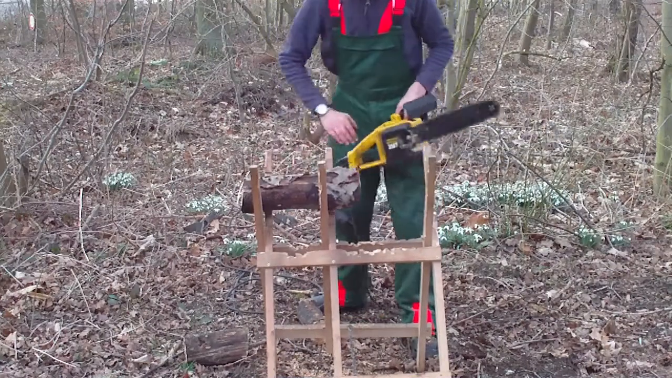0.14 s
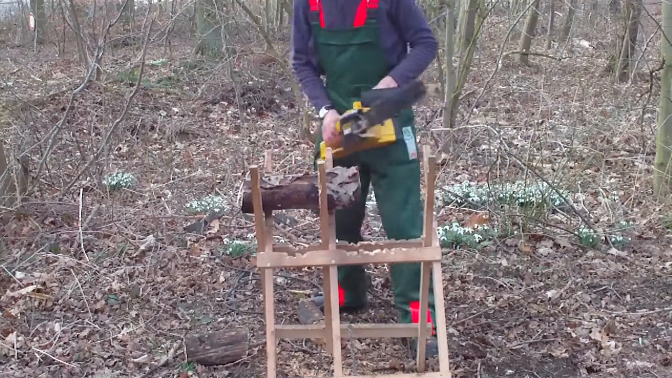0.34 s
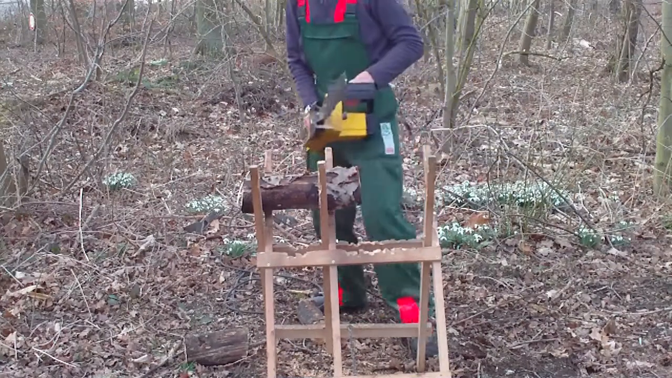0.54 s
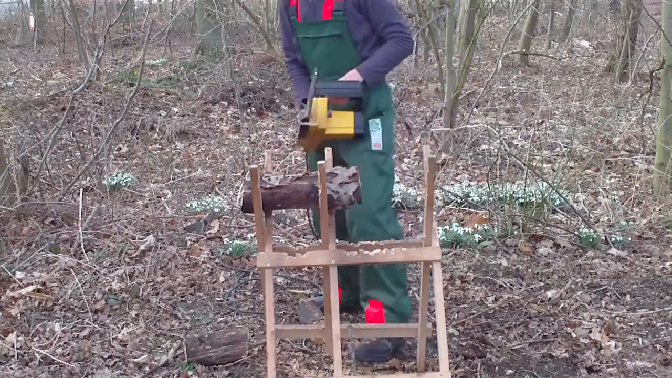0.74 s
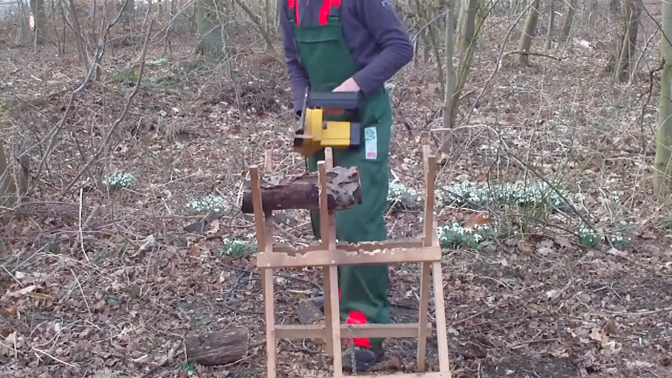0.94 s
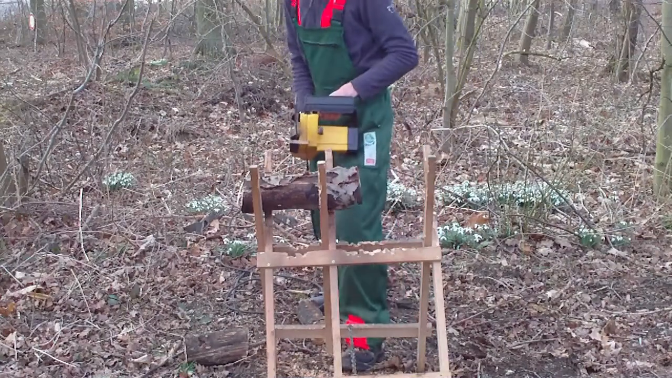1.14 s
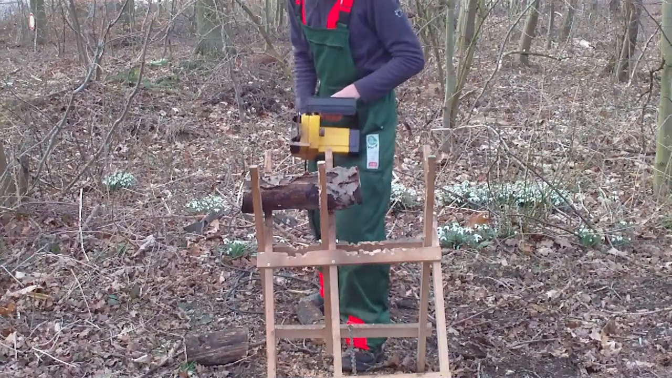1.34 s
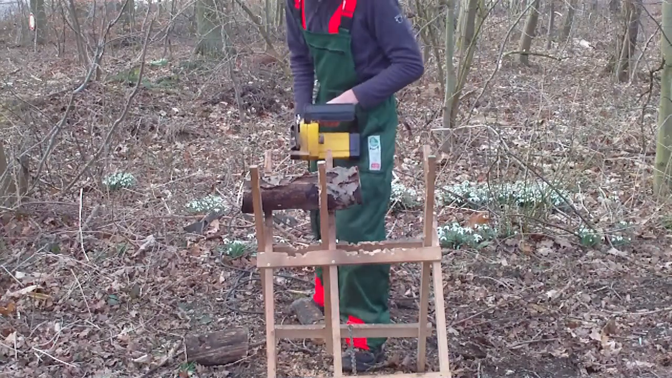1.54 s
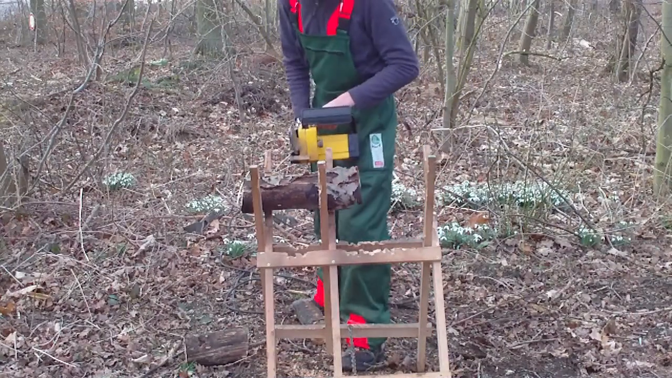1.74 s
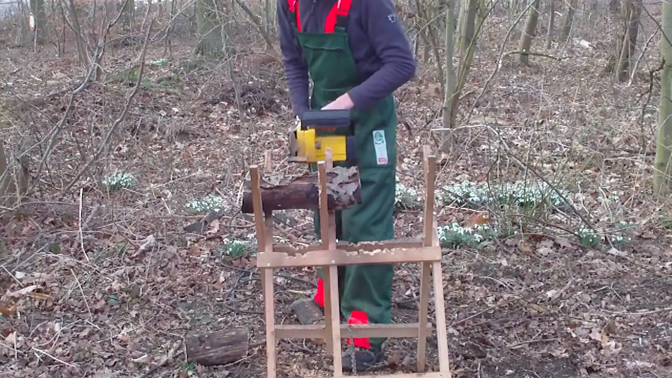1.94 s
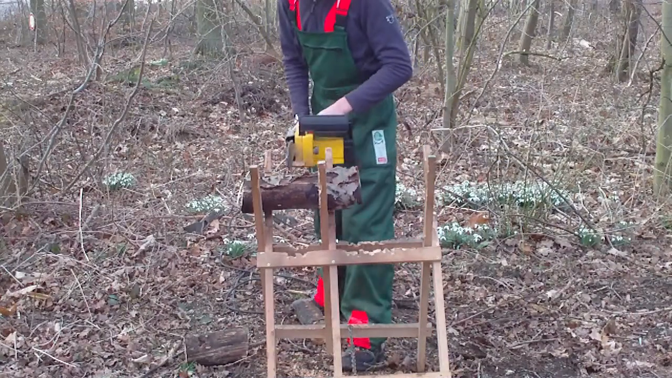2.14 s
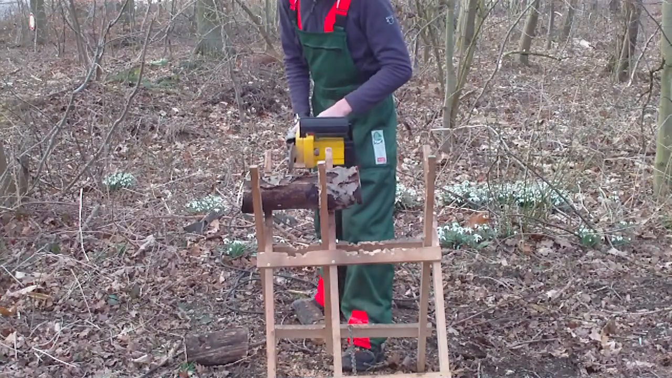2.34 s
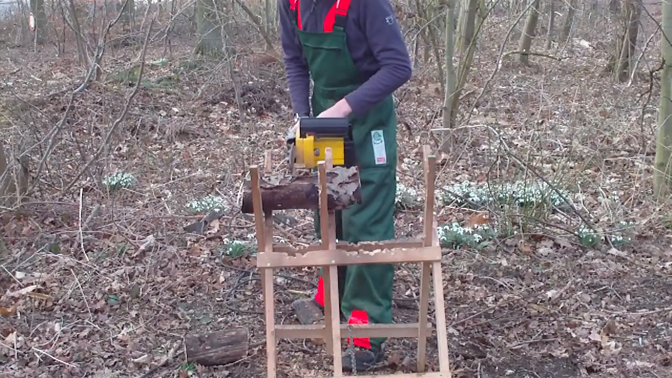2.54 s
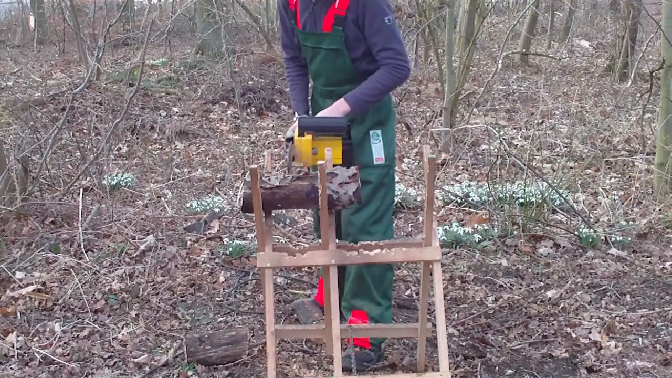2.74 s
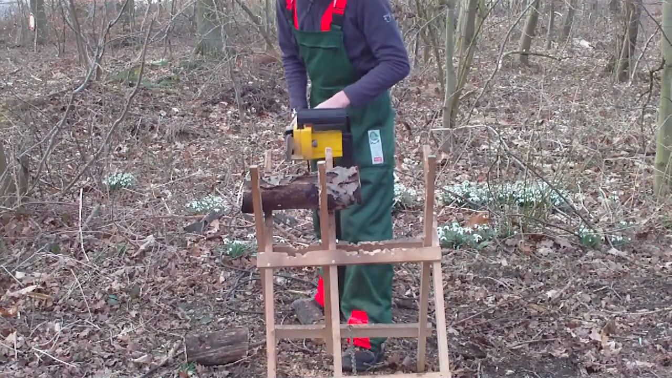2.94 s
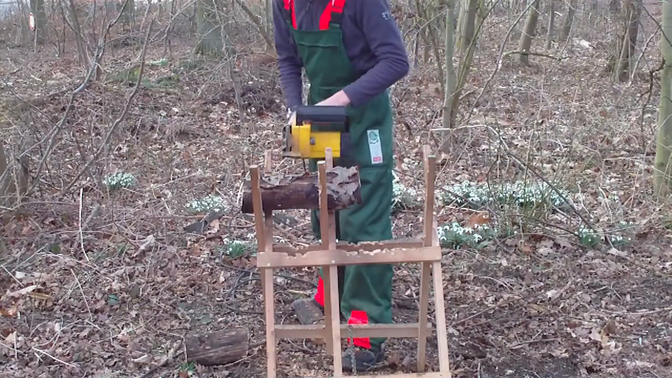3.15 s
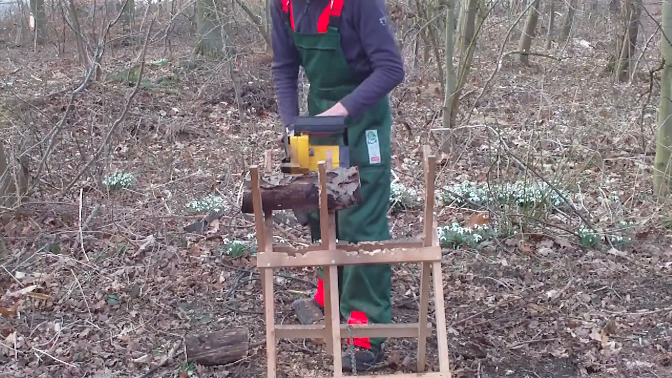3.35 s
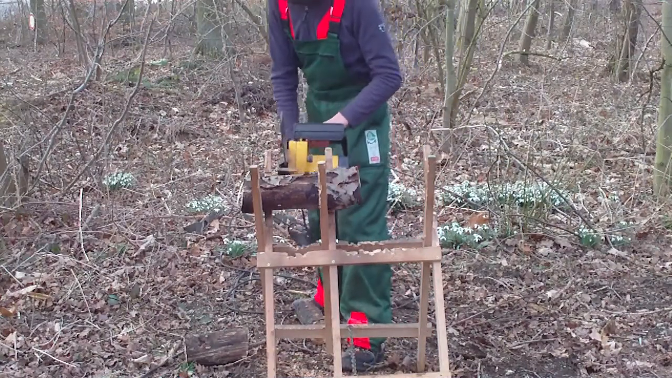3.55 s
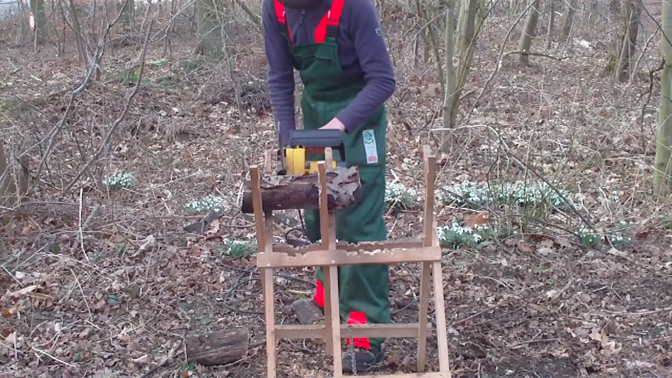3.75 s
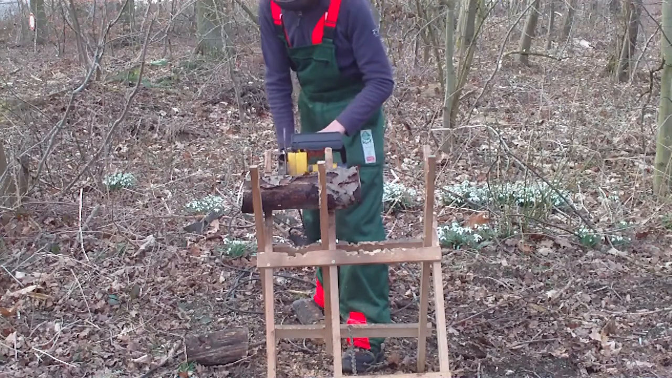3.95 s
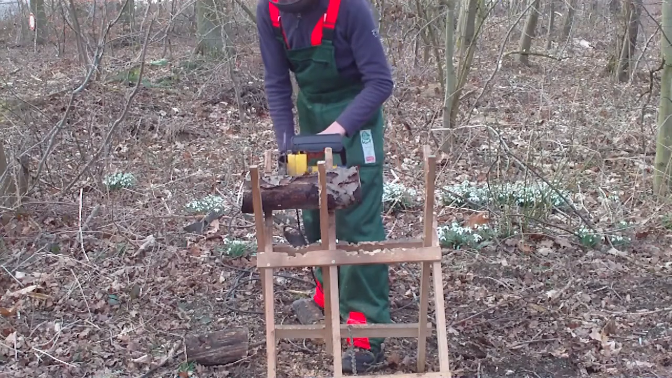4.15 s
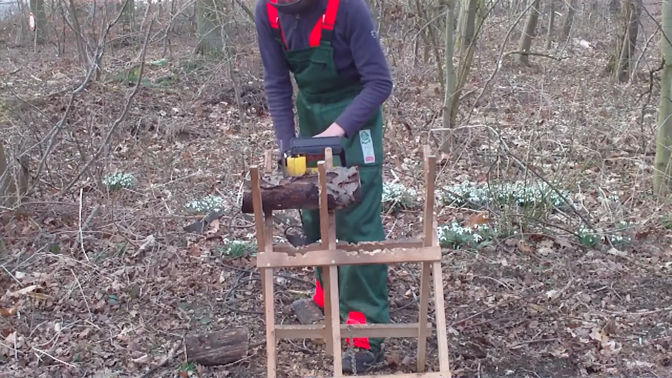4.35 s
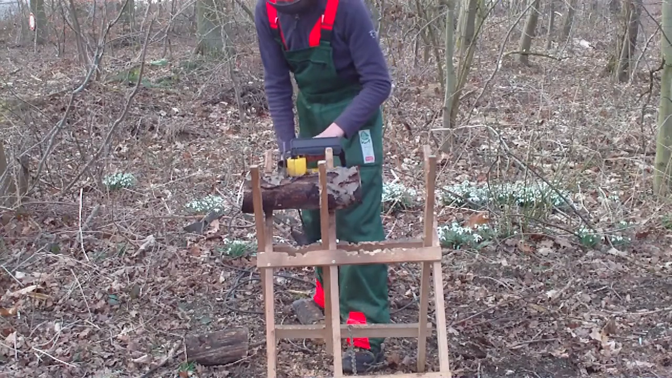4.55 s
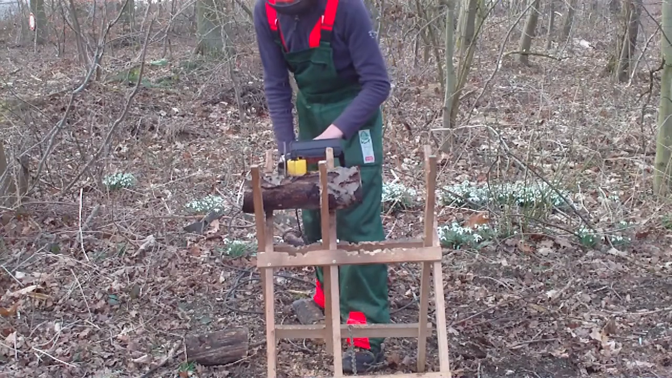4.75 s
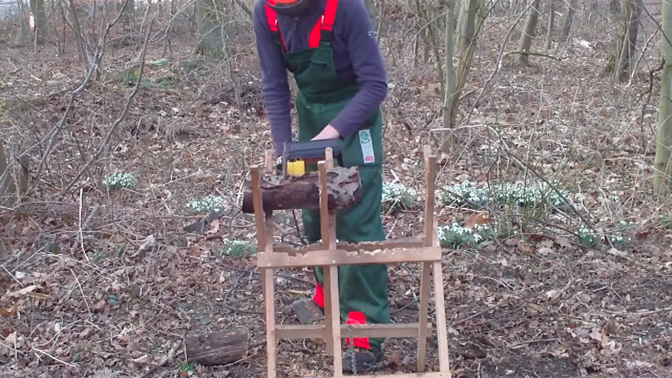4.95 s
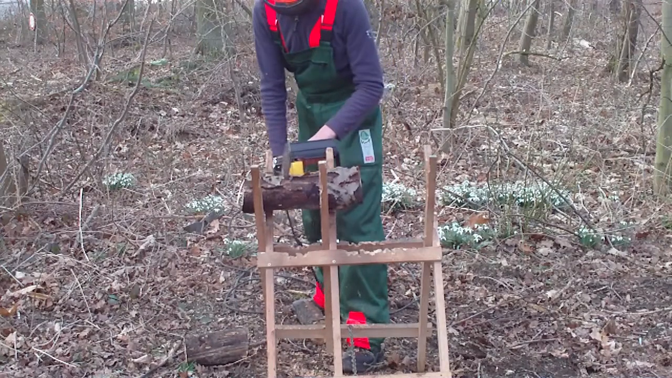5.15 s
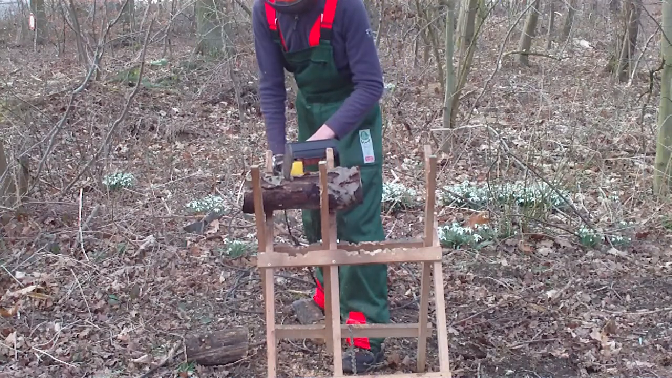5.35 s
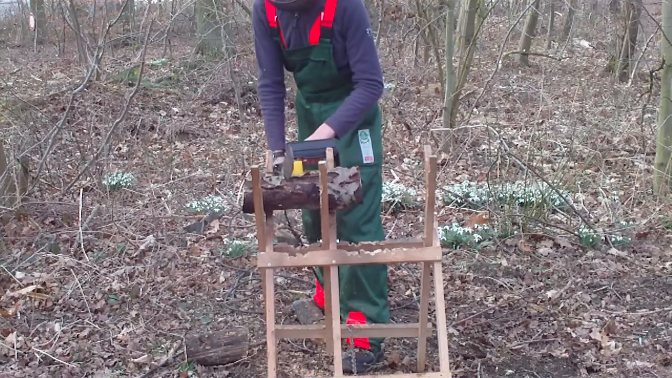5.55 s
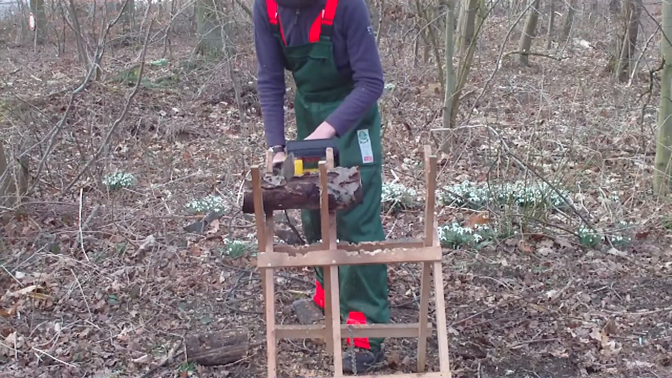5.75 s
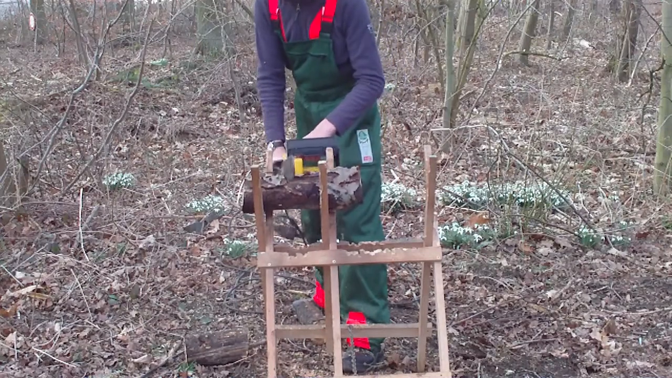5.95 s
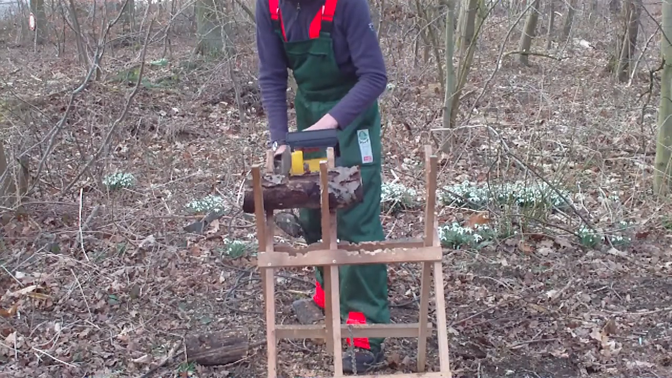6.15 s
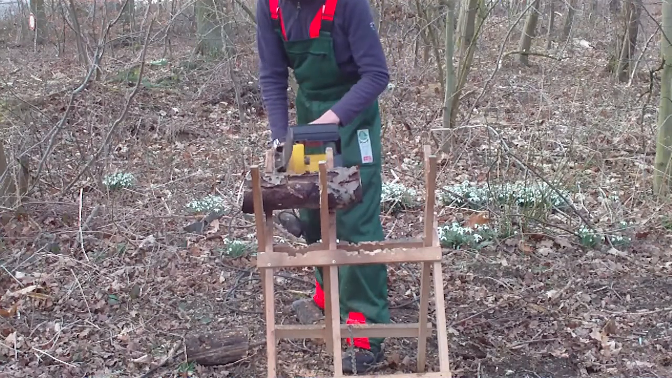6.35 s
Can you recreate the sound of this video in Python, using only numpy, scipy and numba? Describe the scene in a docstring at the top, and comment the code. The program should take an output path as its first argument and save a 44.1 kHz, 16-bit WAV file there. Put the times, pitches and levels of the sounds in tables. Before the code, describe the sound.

Outdoors in a bare wood, a soft hiss and low wind rumble with faint bird peeps. A hard plastic latch snaps, gloves tick and crackle lightly, then an electric chainsaw starts abruptly a few metres from the microphone. Its whine dips, climbs to a bright racing rattle, sags heavily as it meets the log, then recovers into a steady, rasping cut that continues to the end.

```python
"""A bare wood, an electric chainsaw a few metres off: a latch snaps, gloves rustle, birds peep, then the motor
spins up, sags twice under load and settles into a deep cut. Chain: noisy blows ringing housing, steel bar and log.
Motor: sines locked to shaft turns, plus fan noise in bands that track speed. Latch: pulses and shell scrape.
Gloves: crackle and damped sine ticks. Birds: short drooping sines. Below: hiss, wind rumble, a fading hum."""
import sys
import numpy as np
from scipy import signal
from scipy.fft import rfft, irfft
from scipy.io import wavfile
from scipy.ndimage import uniform_filter1d
from numba import njit

SR = 44100
rng = np.random.default_rng(int(sys.argv[2]) if len(sys.argv) > 2 else 0)


def wav_out(sig):
    """Save sig, one row per channel (or a flat mono array), as 16-bit PCM at SR to the path in sys.argv[1]."""
    wavfile.write(sys.argv[1], SR, np.round(np.clip(np.atleast_2d(sig).T, -1, 1) * 32767).astype(np.int16))


N = 282681
START_S = 1.843  # motor switched on
FULL_HZ = 350  # reference motor speed, turns per s


def undb(db):
    """Amplitude from dB."""
    return 10 ** (np.asarray(db) / 20)


def unit(x):
    """Scale to unit rms."""
    return x / np.sqrt(np.mean(x ** 2))


def curves(table):
    """Columns of a table, interpolated over its first column (s)."""
    s, *columns = np.transpose(table)
    return [np.interp(np.arange(N) / SR, s, c) for c in columns]


def ramp(start_s, rise_s):
    """0 before the start, 1 after the rise."""
    return np.clip((np.arange(N) / SR - start_s) / rise_s, 0, 1)


def walk(rate_hz):
    """Random levels held 1 / rate_hz and slewed twice; spread near 1."""
    k = max(int(SR / rate_hz), 1)
    steps = np.repeat(rng.standard_normal(N // k + 1), k)
    return 1.394 * uniform_filter1d(uniform_filter1d(steps, k), k)[:N]


def rev(hz, db, db_per_oct, deep_db):
    """Level (dB) that follows motor speed and shifts as the cut goes deep."""
    deep = ramp(4.2, 0.5)
    return db + db_per_oct * np.log2(hz / FULL_HZ) + deep_db * deep


def colour(x, points):
    """Shape the spectrum by (Hz, dB) points, linear over log frequency."""
    hz, db = np.transpose(points)
    f = np.arange(N // 2 + 1) * SR / N + 1
    return irfft(rfft(x) * undb(np.interp(np.log(f), np.log(hz), db)), N)


def ring(x, modes):
    """Sum of damped resonances (Hz, width Hz, dB), every second one in opposite phase."""
    f = np.arange(N // 2 + 1) * SR / N
    response = 0
    for k, (hz, width_hz, db) in enumerate(modes):
        damping = 1j * f * width_hz
        response = response + (-1) ** k * undb(db) * damping / (hz ** 2 - f ** 2 + damping)
    return irfft(rfft(x) * response, N)


def knocks(per_s, spread_db, hiss):
    """Dense uneven blows of either sign over a bed of hiss."""
    hit = rng.random(N) < per_s / SR
    size = undb(spread_db * rng.exponential(1, N)) * rng.choice([-1, 1], N)
    return unit(unit(hit * size) + hiss * rng.standard_normal(N))


@njit
def sweep(x, hz, share):
    """State-variable band-pass whose centre moves every sample; share = width / centre."""
    y, band, low = np.empty(len(x)), 0., 0.
    for i in range(len(x)):
        g = np.tan(np.pi * hz[i] / SR)
        v = (band + g * (x[i] - low)) / (1 + g * (g + share))
        band, low, y[i] = 2 * v - band, low + 2 * g * v, share * v
    return y


def chain(hz, turn):
    """Links slap housing and bar, cutters bite the log; load jolts shake all three together."""
    # load on the chain: time_s, housing_rattle_db, cutter_rasp_db
    work = [(1.84, -25.5, -42), (1.86, -21, -26.5), (2.0, -17.5, -26.5), (2.13, -16.5, -28),
            (2.31, -18, -24.5), (2.55, -18.5, -22), (3.29, -17, -20.5), (3.74, -16, -23),
            (4.08, -21, -21.5), (4.67, -26.5, -23), (4.71, -22.5, -19.5), (4.84, -21, -20),
            (5.02, -25, -16), (5.14, -23, -16.5), (6.0, -20, -16), (6.41, -16.5, -19)]
    # housing resonances: centre_hz, width_hz, level_db
    housing_modes = [(615, 118, -9), (1005, 57, 4), (916, 69, -2.5), (360, 214, -12.5), (1121, 140, -3),
                     (1760, 104, -7.5), (2195, 275, -11.5)]
    # steel bar resonances: centre_hz, width_hz, level_db
    bar_modes = [(3734, 174, 1), (4830, 190, -0.5), (5400, 160, 2.5), (6590, 310, 7), (9940, 1230, -3),
                 (11900, 590, -8), (13270, 690, -9)]
    # log resonances: centre_hz, width_hz, level_db
    log_modes = [(565, 278, 2.5), (713, 305, 3.5), (1198, 178, 1), (1896, 179, 0.5), (2614, 380, -9.5)]

    housing_db, log_db = curves(work)
    # bar follows the housing rattle by 0.12 dB per dB
    bar_db = rev(hz, db=-28, db_per_oct=6.5, deep_db=1.5) + 0.12 * (housing_db - housing_db.mean())
    bar_gain = ramp(START_S, 0.038) ** 2 * undb(bar_db)
    jolt_db = 0.54 * walk(30) + 0.88 * walk(90)
    # the drive sprocket turns slower than the motor and beats once a tooth gap
    beat = 1 + 0.19 * np.cos(2 * np.pi * 0.29 * turn)

    # loose links slap now and then: a sudden swell that dies in a few ms
    slaps_per_s, slap_decay_s = 90, 0.0036
    slap = (rng.random(N) < slaps_per_s / SR) * rng.exponential(1, N)
    slap = signal.lfilter([1], [1, -np.exp(-1 / (slap_decay_s * SR))], slap)
    # a chain pulled taut in the cut slaps less
    slap *= np.clip((-15.5 - log_db) / 9, 0.1, 1)

    housing = unit(ring((1 + 0.5 * slap) * knocks(2500, 1.54, 0.92), housing_modes))
    bar = unit(ring((1 + 0.3 * slap) * beat * knocks(5000, 1.6, 0.46), bar_modes))
    # the bar's highest ring wakes up with speed
    top_edge_hz, top_gain_per_oct = 10700, 0.51
    top = signal.sosfiltfilt(signal.butter(2, top_edge_hz, "high", fs=SR, output="sos"), bar)
    bar = bar + top_gain_per_oct * np.log2(hz / FULL_HZ).clip(-1) * top
    log = unit(ring((1 + 0.12 * slap) * knocks(2000, 1.47, 0.84), log_modes))
    return undb(jolt_db) * (undb(housing_db) * housing + bar_gain * bar + undb(log_db) * log)


def motor_whine(hz, turn):
    """Sines on multiples of the turn rate, weighted by how well the casing lets each pitch out."""
    # shaft, three chain link tones, gear, a tone at seven times the shaft, two fan tones; level before casing:
    # turn_multiple, level_at_full_hz_db, speed_slope_db_per_oct, deep_cut_change_db, flicker_db, veiled_0_to_1
    lines = [(1, -44, 25, 5, 1.5, 1), (1.115, -35.5, 18, -24, 1.8, .3), (1.63, -33.5, 16, -18, 3, 1),
             (2.23, -34, 14, -18, 2.5, 1), (4, -31, -2, 5.5, 2, 1), (7, -47, 8, 11, 2.5, 1),
             (11, -42.5, -6, -1, 2.5, 1), (12, -47, 20, 6, 3, 1)]
    # casing transmission: pitch_hz, gain_db
    casing = [(260, -10), (300, 0), (880, 0), (960, -12), (1050, -5), (1150, 4), (1300, 1), (1450, -2),
              (1600, 0), (2450, 5), (2750, 6), (2950, -2), (3300, 2), (4000, 2), (4200, -2), (4500, -3),
              (4700, 1)]
    # spans where the tones sink, the start with its first sag and the later speed recovery: from_s, to_s
    veils = [(1.8, 2.36), (4.62, 4.8)]

    veil_depth_db, veil_edge_s = -13, 0.06
    veil_db = veil_depth_db * sum(ramp(a, veil_edge_s) - ramp(b, veil_edge_s) for a, b in veils)
    whine = 0
    for multiple, *law, flicker_db, veiled in lines:
        casing_db = np.interp(multiple * hz, *np.transpose(casing))
        level_db = rev(hz, *law) + casing_db + veiled * veil_db + flicker_db * walk(20)
        whine = whine + undb(level_db) * np.sqrt(2) * np.sin(2 * np.pi * multiple * turn)
    return whine


def fan_air(hz):
    """The fan blows noise in broad bands whose centres ride the motor speed."""
    # blown bands: turn_multiple, width_share_of_centre, relative_level_db
    bands = [(12.35, 0.18, -2), (23.84, 0.11, -3.5)]
    # air inlet resonance: centre_hz, width_hz, level_db
    inlet = [(9680, 125, 11.5)]

    air = sum(undb(db) * sweep(rng.standard_normal(N), k * hz, 1. * share) for k, share, db in bands)
    # the inlet sings when the upper band sweeps over it
    air = air + ring(air, inlet)
    air_db = rev(hz, db=-31.5, db_per_oct=14.5, deep_db=2.1) + walk(40)
    return ramp(START_S, 0.05) ** 2 * undb(air_db) * unit(air)


def latch():
    """Each snap is a sharp inward knock and a ragged scrape in the plastic shell."""
    # snaps: start_s, knock_peak_db, scrape_db (before its rise and decay), scrape_decay_s
    snaps = [(.344, -30, -32, 0.0079), (0.39, -30, -29.5, 0.015), (0.4117, -21, -17.5, 0.0033),
             (0.4144, -10, -20.5, 0.0029), (0.4155, -16, -27, 0.0024), (0.422, -18, -33, 0.02)]
    # shell resonances: centre_hz, width_hz, level_db
    shell_modes = [(270, 34, 4.5), (525, 100, 3), (970, 110, 2.5), (1430, 260, -4.5), (2200, 270, -5.5),
                   (5000, 1600, -20.5), (9000, 4400, -25)]

    rise_s, knock_half_s = 0.00058, 0.00013
    t, scrape, knock = np.arange(N) / SR, np.zeros(N), np.zeros(N)
    for start_s, knock_db, scrape_db, decay_s in snaps:
        u = np.maximum(t - start_s, 0)
        scrape += undb(scrape_db) * (1 - np.exp(-u / rise_s)) * np.exp(-u / decay_s)
        knock -= undb(knock_db) * np.exp(-((t - start_s) / knock_half_s) ** 2)
    return knock + unit(ring(knocks(1500, 1.4, 0.87), shell_modes)) * scrape


def gloves():
    """Cloth and dry bark: faint crackle with a few clearer damped ticks."""
    # crackle level: time_s, level_db
    rustle = [(1.2, -80), (1.414, -55.5), (1.484, -67), (1.67, -53), (1.688, -73), (1.802, -77),
              (1.84, -72)]
    # ticks: start_s, peak_db, pitch_hz
    ticks = [(0.651, -43, 6210), (0.7378, -42, 6470), (1.1848, -46, 6250), (1.5465, -44, 8800),
             (1.5739, -38, 8900), (1.601, -38, 4780), (1.63, -34, 4770), (1.6736, -32, 5370),
             (1.7176, -46, 5090), (1.7345, -39, 5570), (1.764, -45, 6500), (1.8303, -51, 6650)]

    t = np.arange(N) / SR
    modes = [(5200, 1100, 4), (8700, 980, 2), (12500, 3000, -5)]  # centre_hz, width_hz, level_db
    crackle = unit(ring(knocks(820, 2.1, 0.5) * undb(2 * walk(69.5)), modes))
    out = crackle * undb(curves(rustle)[0]) * (t > rustle[0][0]) * (t < rustle[-1][0])
    tick_decay_s, scratch_db, scratch_decay_s = 0.0011, -12, 0.005  # scratch relative to its tick
    u = np.arange(900) / SR
    for start_s, db, hz in ticks:
        i = int(start_s * SR)
        tick = np.exp(-u / tick_decay_s) * np.sin(2 * np.pi * hz * u)
        scratch = undb(scratch_db) * np.exp(-u / scratch_decay_s) * crackle[i:i + len(u)]
        out[i:i + len(u)] += undb(db) * (tick + scratch)
    return out


def birds():
    """Short distant whistles, near sine, drooping a little."""
    # whistles: start_s, length_s, pitch_hz (at onset), level_db
    peeps = [(.65, .05, 3470, -63), (.65, .04, 4100, -63), (.72, 0.045, 2550, -62), (.77, .03, 3950, -64),
             (.79, .1, 2730, -67), (.96, 0.023, 2740, -57), (1.05, 0.036, 3400, -61),
             (1.19, .03, 2700, -66), (1.255, .03, 3870, -66), (1.3, 0.027, 6250, -58),
             (1.445, .03, 3400, -63), (1.46, .02, 2550, -60)]

    out = np.zeros(N)
    for start_s, length_s, hz, db in peeps:
        u = np.arange(int(length_s * SR)) / SR
        i = int(start_s * SR)
        swell = np.sqrt(2 * np.sin(np.pi * u / length_s))
        out[i:i + len(u)] += undb(db) * swell * np.sin(2 * np.pi * hz * u * (1 - 0.15 * u))
    return out


def wind():
    """Gusty rumble on the microphone; stronger gusts buffet higher up."""
    # rumble spectrum: freq_hz, relative_db_per_hz
    rumble_shape = [(15, 0), (45, 0.5), (65, -1.5), (92, 3), (125, -10), (200, -12), (300, -18),
                    (400, -40.5)]
    # gusts: centre_s, half_length_s, db_over_breeze
    gusts = [(0.427, 0.092, 3.5), (1.66, .25, 4.5), (2.037, 0.23, 7), (2.7, 0.33, 3.5), (3.62, 0.12, 4),
             (4.27, .25, -3.5), (5.6, 0.58, 2.5)]

    t = np.arange(N) / SR
    breeze_db = -44
    gust_db = breeze_db + sum(db * np.exp(-((t - s) / half_s) ** 2) for s, half_s, db in gusts)
    rumble = unit(colour(rng.standard_normal(N), rumble_shape)) * undb(gust_db + 1.1 * walk(4.92))
    buffet_db = 1.6 * (gust_db + 45) - 63 + 2 * walk(20)
    buffet = unit(ring(rng.standard_normal(N), [(170, 70, 0)])) * undb(buffet_db)
    return rumble + buffet


def woodland_hiss():
    """Smooth far hiss: noise shaped to a fixed spectrum, level wavering slowly."""
    # hiss spectrum: freq_hz, relative_db_per_hz
    hiss_shape = [(76, -33), (130, 0), (156, -7), (307, -13), (390, -2.5), (581, -7.5), (977, -4),
                  (2010, -17.5), (5030, -26), (6650, -19.5), (15400, -41)]
    return unit(colour(rng.standard_normal(N), hiss_shape)) * undb(-51 + walk(12))


def hum():
    """Thin sine with wandering phase and level, fading 2.5 dB per s."""
    t = np.arange(N) / SR
    level_db = -56.5 - 2.5 * t + 1.5 * walk(5)
    return undb(level_db) * np.sqrt(2) * np.sin(2 * np.pi * 412 * t + walk(4))


def scene():
    """Drive chain, whine and fan from one motor speed; add the other sources."""
    # motor speed before smoothing: time_s, turns_hz
    speed = [(1.85, 141.5), (1.93, 290.7), (2.05, 276), (2.28, 255.6), (2.4, 249.7), (2.5, 303), (2.6, 333),
             (2.72, 354.6), (2.95, 372.5), (3.35, 389.5), (3.59, 393.5), (3.72, 363), (3.8, 353.7),
             (3.92, 325), (4.25, 271), (4.62, 221), (4.72, 246), (4.85, 310), (5.0, 343), (5.17, 359),
             (5.35, 359.5), (5.8, 354.5), (6, 345), (6.2, 339), (6.41, 342)]

    # the rotor's inertia rounds each change of speed; it hunts slightly as teeth catch and let go
    hz = uniform_filter1d(curves(speed)[0], size=SR // 25) * (1 + 0.002007 * walk(20))
    turn = np.cumsum(hz) / SR
    # little of the rattle's bass carries
    bass_cut = signal.butter(4, 400, "high", fs=SR, output="sos")
    noise = signal.sosfilt(bass_cut, chain(hz, turn) + fan_air(hz))
    saw = ramp(START_S, 0.0063) * (noise + motor_whine(hz, turn))
    return (saw + latch() + gloves() + birds() + wind() + woodland_hiss() + hum())[None]


def record(dry):
    """Soft saturation rounds the loudest peaks; a steep low-pass cuts the top."""
    top_cut = signal.ellip(12, 0.2, 85, 15380, fs=SR, output="sos")
    return signal.sosfilt(top_cut, np.tanh(0.75 * dry) / 0.86)


dry = scene()
out = record(dry)
wav_out(out)
```